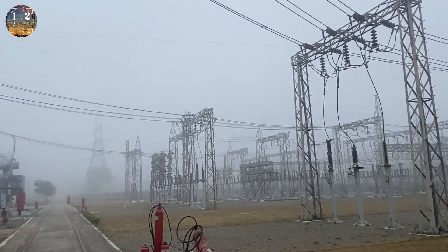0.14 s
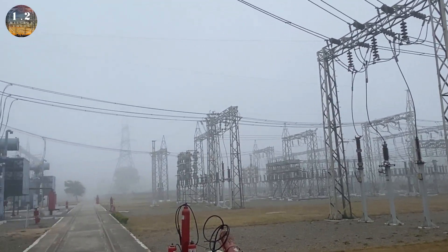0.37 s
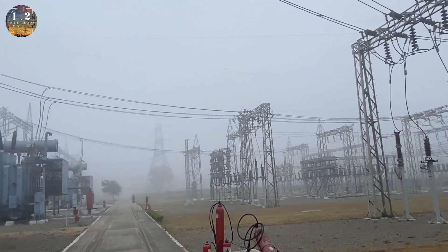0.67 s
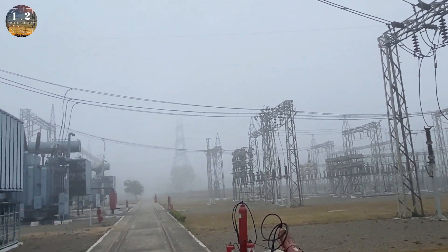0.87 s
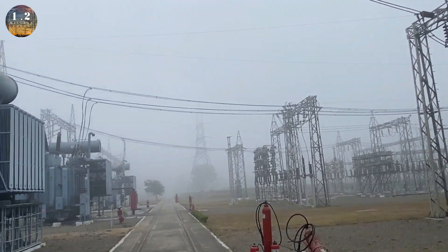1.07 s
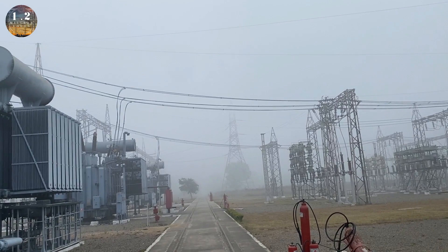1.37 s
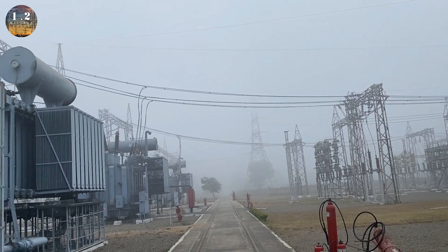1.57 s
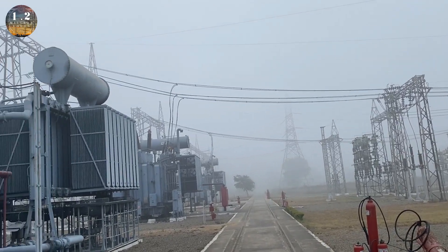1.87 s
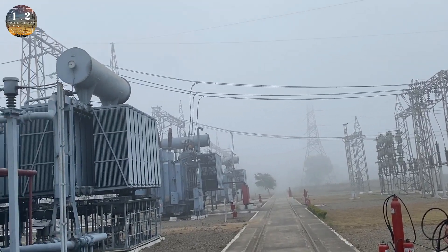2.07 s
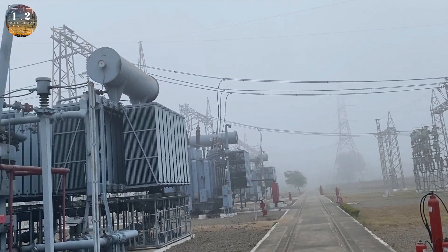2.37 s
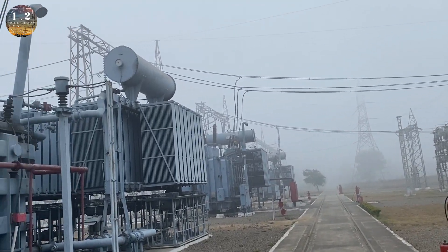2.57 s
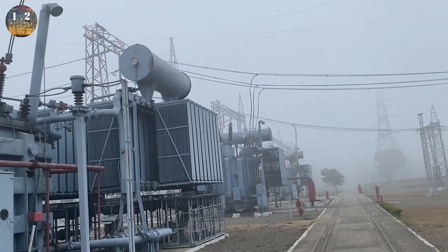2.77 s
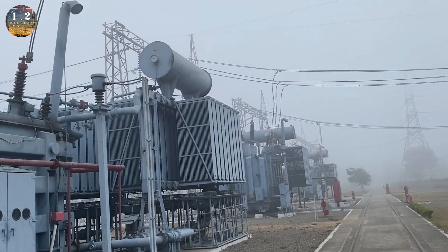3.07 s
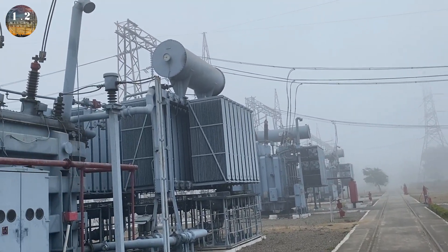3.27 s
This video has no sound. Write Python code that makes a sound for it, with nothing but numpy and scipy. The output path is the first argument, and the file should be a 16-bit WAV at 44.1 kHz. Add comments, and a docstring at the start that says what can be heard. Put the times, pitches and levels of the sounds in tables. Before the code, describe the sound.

Large power transformers hum with a steady, low, buzzing drone in open air; faint birds chirp far off, and a short cluster of small knocks rattles close to the hand-held stereo microphone past the middle.

```python
"""Outdoor substation in damp air: a hand-held stereo microphone turns slowly towards large humming transformers.
The tanks are sums of fluttering sine multiples of the hum; a cooling fan drones in narrow noise resonances,
its lowest tone just under the hum. Banded noise makes the open air and the buzzing hiss of live conductors,
and bright bursts make their ticks. Gliding sines make far chirps and one crow call. Close to the microphone
something small rattles and knocks: rough contacts ring the modes of one body."""
import sys
import numpy as np
from scipy import signal
from scipy.io import wavfile

SR = 44100
rng = np.random.default_rng(int(sys.argv[2]) if len(sys.argv) > 2 else 0)


def store_wav(level_fs):
    """Save 16-bit WAV to argv[1]."""
    pcm = np.round(np.clip(np.atleast_2d(level_fs), -1, 1) * 32767)
    wavfile.write(sys.argv[1], SR, pcm.T.astype(np.int16))


N = 151704

# Distant plant, open air and hiss: (frequency [Hz], density [dB per Hz])
AIR_SPECTRUM = [(50, -69), (70, -75), (130, -75), (220, -95), (350, -81), (540, -86.5), (900, -84),
                (1500, -95), (2200, -99), (3000, -102), (4300, -109), (6000, -112), (16000, -113)]
# Likeness of the air at the two ports: (frequency [Hz], correlation [-1 to 1])
PORT_LIKENESS = [(50, 1), (190, .24), (380, .7), (540, -.21), (1300, -.9), (2150, .9), (4300, .6),
                 (9000, 0)]
PATCHY_DB = .8
BUZZ_DEPTH, BUZZ_FROM_HZ = .18, 3000  # the hiss above this pitch throbs with the hum
TREBLE_RISE_DB = 2  # the same hiss grows by this much during the turn

# Bird notes: (time [s], length [s], first pitch [Hz], last pitch [Hz], level [dB], left minus right [dB])
CHIRPS = [(.062, .1, 3250, 2460, -69, -8), (.118, .045, 4000, 2900, -73, 1.5),
          (.585, .065, 1400, 1480, -69, 11.5), (.64, .13, 3420, 3420, -74, -8),
          (.68, .043, 2170, 2210, -69, 0), (.75, .08, 2800, 2440, -70, -6),
          (.793, .062, 5200, 3350, -71.5, 5.5), (.86, .058, 4680, 4650, -76, -1),
          (.914, .018, 4050, 4850, -68, 0), (.97, .06, 1250, 1310, -69, 9),
          (1.38, .068, 4660, 4600, -77, 2.5), (1.452, .02, 4450, 4200, -76, 2.5),
          (1.455, .013, 2950, 3160, -64, 7), (1.464, .018, 3200, 2600, -64, 7),
          (1.61, .078, 3170, 2960, -63, 3), (2.118, .052, 2960, 2860, -66, 3),
          (3.01, .07, 1480, 1570, -70, -8)]
WAVER = .004  # share of the pitch
CAW_S, CAW_LENGTH_S, CAW_PAN_DB = 3.09, .19, -8
CAW_HZ, CAW_ARCH = 351, .06  # top of the pitch arch, share it drops at both ends
# Tones of the crow call: (multiple of the call pitch, level [dB])
CAW_TONES = [(4, -62), (5, -68), (6, -76)]
BREAKUP_DB = 1.5  # turbulence breaks far notes up
# Echoes off the tanks: (delay [s], level [dB])
TANK_ECHOES = [(.031, -11)]

# Blade tones: (frequency [Hz], width [Hz], level [dB])
FAN_TONES = [(86.46, 1.2, -48.5), (175, 19, -60)]

# Loud sparks, level of the burst envelope: (time [s], level [dB])
LOUD_TICKS = [(0.5696, -62.5), (0.632, -58), (0.8522, -59.5), (2.3321, -59), (2.3518, -57)]
TICK_LOW_HZ, TICK_DECAY_S = 5000, .002
SPARKS_PER_S, SPARKS_DB, SPARKS_SPREAD_DB = 40, -69, 1.6

# Close knocks: (time [s], level [dB], weight of the two top modes [dB], contact length [ms])
KNOCKS = [(1.847, -59.5, 4.5, 5), (1.891, -57, 7.5, 15), (1.938, -58, 5, 4.3), (1.994, -56, -6, 2.2),
          (2.078, -37, -7, 1.3), (2.117, -51, 0.5, 1.2), (2.1348, -31.5, -14.5, 1.2), (2.148, -58, 8, 3.6),
          (2.185, -42, -4, 2.7), (2.221, -53.5, -2, 1.7), (2.232, -60, 6, 2), (2.26, -46, -8, 3)]
# Modes of the small body, lowest first: (frequency [Hz], level [dB], 60 dB decay time [s])
BODY_MODES = [(980, 6, .0055), (2300, 0, .0026), (4500, -4, .0015), (7000, -5, .0012)]
THUMP_GROWTH = 4  # extra dB the lowest mode loses per dB a knock is below the loudest
KNOCK_TOP_HZ, KNOCK_PAN_DB = 8500, -2

HUM_HZ = 100.06
# Tank vibration: (multiple of the hum, early left [dB], early right [dB], late left [dB], late right [dB])
TANK_ORDERS = [(1, -37.0, -36.0, -36.0, -35.0), (2, -44.0, -50.0, -41.0, -44.0),
               (3, -31.0, -33.0, -30.0, -29.0), (4, -34.0, -34.0, -40.0, -40.0),
               (5, -45.0, -51.0, -46.0, -47.0), (6, -50.0, -57.0, -46.0, -54.0),
               (7, -48.0, -53.0, -55.0, -58.0), (8, -51.0, -54.0, -54.0, -54.0),
               (9, -50.0, -52.0, -54.0, -57.0), (10, -49.0, -51.0, -54.0, -55.0),
               (11, -65.0, -59.0, -67.0, -68.0), (12, -66.0, -64.0, -76.0, -70.0),
               (13, -64.0, -62.0, -61.0, -74.0), (14, -65.0, -59.0, -67.0, -65.0),
               (15, -75.0, -64.0, -72.0, -73.0), (16, -69.0, -63.0, -76.0, -73.0),
               (18, -75.0, -74.0, -72.0, -73.0), (19, -71.0, -69.0, -73.0, -82.0),
               (21, -83.0, -81.0, -74.0, -75.0), (23, -76.0, -76.0, -80.0, -82.0),
               (25, -83.0, -81.0, -76.0, -79.0)]
# Odd multiples of the mains: (multiple of the hum, level [dB])
HALF_ORDERS = [(1.5, -64), (2.5, -68), (3.5, -69), (4.5, -63), (6.5, -69), (17.5, -77)]
FINE_ORDERS, FINE_DB = (17, 20, 22, 24, 28), -81  # weak high multiples
# Ends of the turn: (early time [s], late time [s])
TURN_S = (.4, 3.0)
# How much sooner the left port hears the tanks: (time [s], lead [ms])
LEFT_LEAD = [(0, .38), (1.7, .27), (3.44, .13)]
START_S, SCATTER_PER_ORDER = .0005, .012  # common delay; phase spread in radians per multiple squared
FLUTTER, FLUTTER_HZ = .044, 24.8  # air turbulence roughens each line: radians, and share of its level
SWAY_DB, SWAY_HZ = .39, .23
WHINE_ORDER, WHINE_LATE_S = 7, .0022  # from this multiple up the pulse comes later
FRONT_ORDER, FRONT_SHARE = 18, .22  # from here up sound comes from nearly ahead: share of the lead
BASS_SHARE = 1.3  # below the whine, waves bend round the housing: share of the lead


def amp(db):
    """Gain of a level in dB."""
    return 10 ** (np.asarray(db) / 20)


def unit(x):
    """Signal scaled to rms 1."""
    return x / np.sqrt(np.mean(x ** 2) + 1e-30)


def at_hz(points, hz):
    """Spectrum table read on a log frequency axis."""
    table = np.array(points)
    return np.interp(np.log(hz), np.log(table[:, 0]), table[:, 1])


def drift(rate_hz, count=1):
    """Slow random wander of rms 1: noise through two equal poles, computed every 40 samples."""
    pole = np.exp(-80 * np.pi * rate_hz / SR)
    noise = rng.standard_normal((count, N // 40 + 2002))
    slow = signal.lfilter([1], [1, -2 * pole, pole * pole], noise)[:, 2000:]
    return np.array([np.interp(np.arange(N) / 40, np.arange(len(s)), unit(s)) for s in slow])


def ring(x, hz, t60):
    """Two-pole resonance: a click sets a decaying sine ringing."""
    radius, turn = 10 ** (-3 / (t60 * SR)), 2 * np.pi * hz / SR
    return signal.lfilter([0, np.sin(turn)], [1, -2 * radius * np.cos(turn), radius ** 2], x + 1e-18)


def pan(db):
    """Left and right gains; positive dB leans left."""
    return amp([[db / 2], [-db / 2]])


def air():
    """Open air and conductor hiss: third-octave bands of stereo noise, patchy, with buzzing treble."""
    out = 0
    edges = 22 * 2 ** np.arange(0, 9.7, 1 / 3)
    together = drift(8)[0]
    white = rng.standard_normal((2, 2, N))  # neighbouring bands use different noise
    buzz = 1 + BUZZ_DEPTH * np.sin(2 * np.pi * HUM_HZ * np.arange(N) / SR)
    buzz = buzz * amp(TREBLE_RISE_DB * np.linspace(-.5, .5, N))
    for k, (low, high) in enumerate(zip(edges, edges[1:])):
        band = signal.butter(2, [low, high], "band", fs=SR, output="sos")
        mid, side = signal.sosfilt(band, white[k % 2])
        hz = np.sqrt(low * high)
        alike = np.clip(at_hz(PORT_LIKENESS, hz), -1, 1)
        gain = amp(at_hz(AIR_SPECTRUM, hz) + PATCHY_DB * (together + drift(43)[0]))
        if hz > BUZZ_FROM_HZ:
            gain = gain * buzz
        out = out + gain * (np.sqrt(1 + alike) * mid + np.sqrt(1 - alike) * side * [[1], [-1]])
    out = out * np.sqrt(SR / 4)  # density per Hz to sample level
    # the open air carries little below the rumble
    return signal.sosfilt(signal.butter(4, 47, "high", fs=SR, output="sos"), out)


def note(s, length, hz, db, pan_db):
    """One sine note on a pitch law hz(u), u from 0 to 1, wavering a little."""
    out, u = np.zeros((2, N)), np.linspace(0, 1, int(length * SR))
    pitch = hz(u) * (1 + WAVER * drift(40)[0, :len(u)])
    swell = np.sqrt(2 * np.tanh(2 * np.sin(np.pi * u)))
    tone = swell * np.sin(2 * np.pi * np.cumsum(pitch) / SR)
    start = int(s * SR)
    out[:, start:start + len(u)] = pan(pan_db) * amp(db) * tone
    return out


def chirps():
    """Far birds: gliding notes whose pitch flattens out."""
    return sum(note(s, length, lambda u: last + (first - last) * (1 - u) ** 1.4, db, pan_db)
               for s, length, first, last, db, pan_db in CHIRPS)


def caw():
    """Crow call: a few upper multiples of one arched pitch, each wavering on its own."""
    return sum(note(CAW_S, CAW_LENGTH_S, lambda u: k * CAW_HZ * (1 - CAW_ARCH * (1 - 2 * u) ** 2),
                    db, CAW_PAN_DB) for k, db in CAW_TONES)


def birds():
    """Chirps and crow over distance: turbulence flickers their level and the tanks echo them."""
    direct = (chirps() + caw()) * amp(BREAKUP_DB * drift(70))
    return direct + sum(amp(db) * np.roll(direct, int(s * SR), axis=1) for s, db in TANK_ECHOES)


def fan():
    """Blade tones: noise in narrow resonances, the same at both ports."""
    out = 0
    for hz, width_hz, db in FAN_TONES:
        t60 = np.log(1000) / np.pi / width_hz
        settled = ring(rng.standard_normal(N + SR), hz, t60)[SR:]
        out = out + amp(db) * unit(settled)
    return out


def sparks():
    """Tiny discharges: short bright noise bursts, a few loud ones and a random scatter."""
    levels = amp(SPARKS_DB + SPARKS_SPREAD_DB * rng.standard_normal(N))
    clicks = (rng.random(N) < SPARKS_PER_S / SR) * levels
    for s, db in LOUD_TICKS:
        clicks[int(s * SR)] = amp(db)
    envelope = signal.lfilter([1], [1, -np.exp(-1 / (TICK_DECAY_S * SR))], clicks + 1e-18)
    noise = rng.standard_normal(N) + .5 * rng.standard_normal((2, N))  # shared, plus some per port
    return signal.sosfilt(signal.butter(2, TICK_LOW_HZ, "high", fs=SR, output="sos"), envelope * noise)


def knocks():
    """Close knocks: a click rings the low mode of a small body, short rough contacts its upper modes."""
    out, t = np.zeros(N), np.arange(2000) / SR
    loudest_db = max(row[1] for row in KNOCKS)
    (low_hz, low_db, low_t60), *upper = BODY_MODES
    thump = ring(ring(1. * (t == 0), low_hz, low_t60), low_hz, low_t60)
    for s, db, top_db, ms in KNOCKS:
        contact = rng.standard_normal(len(t)) * t * np.exp(-2000 * t / ms)
        rings = [(thump, low_db + THUMP_GROWTH * (db - loudest_db))]
        for k, (hz, mode_db, t60) in enumerate(upper):
            rings.append((ring(ring(contact, hz, t60), hz, t60), mode_db + top_db * (k > 0)))
        start = int(s * SR)
        out[start:start + len(t)] += sum(amp(db + mode_db) * x / abs(x).max() for x, mode_db in rings)
    return signal.sosfilt(signal.butter(2, KNOCK_TOP_HZ, fs=SR, output="sos"), out) * pan(KNOCK_PAN_DB)


def lead_share(k):
    """Part of the left port's lead that a multiple of the hum takes."""
    if k >= FRONT_ORDER:
        return FRONT_SHARE
    return BASS_SHARE if k < WHINE_ORDER else 1


def transformers():
    """Tank hum: multiples in step but for a scatter growing with order, levelled and delayed per port."""
    t = np.arange(N) / SR
    lead = np.interp(t, *np.transpose(LEFT_LEAD)) / 1000
    rough, out = drift(FLUTTER_HZ, count=4), np.zeros((2, N))
    faint = HALF_ORDERS + [(k, FINE_DB) for k in FINE_ORDERS]
    orders = TANK_ORDERS + [(k, db, db, db, db) for k, db in faint]
    for n, (k, *db) in enumerate(orders):
        phase = rng.normal() * SCATTER_PER_ORDER * k * k + FLUTTER * rough[n % 2]
        gain = np.sqrt(2) * (1 + FLUTTER * rough[2 + n % 2]) * amp(SWAY_DB * drift(SWAY_HZ)[0])
        late = START_S + WHINE_LATE_S * (k >= WHINE_ORDER)
        for side in (0, 1):
            level = amp(np.interp(t, TURN_S, db[side::2]))
            heard = t - late - side * lead * lead_share(k)  # the right port hears it after the left
            out[side] += gain * level * np.sin(2 * np.pi * k * HUM_HZ * heard + phase)
    return out


def scene():
    """All sources summed at the two microphone ports."""
    return air() + birds() + fan() + sparks() + knocks() + transformers()


def record(dry):
    """Steep low-pass: the top is 60 dB down from 16050 Hz."""
    return signal.sosfilt(signal.cheby2(20, 60, 16050, fs=SR, output="sos"), dry)


dry = scene()
out = record(dry)
store_wav(out)
```